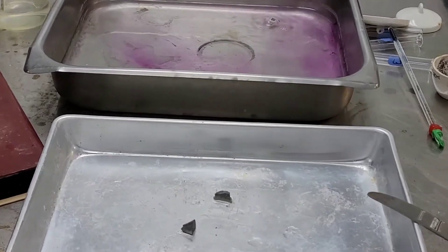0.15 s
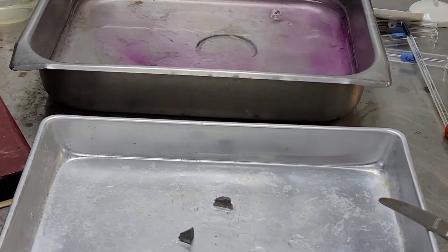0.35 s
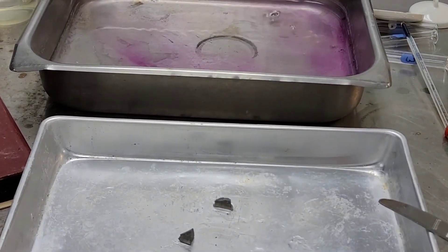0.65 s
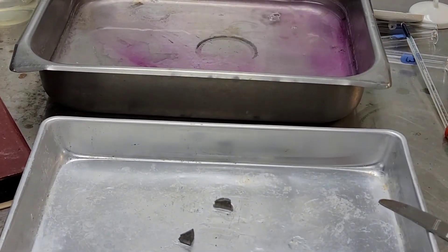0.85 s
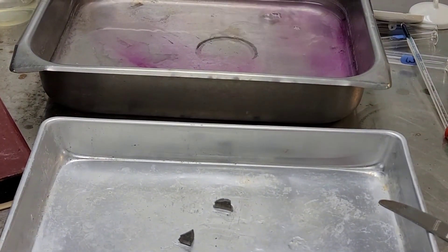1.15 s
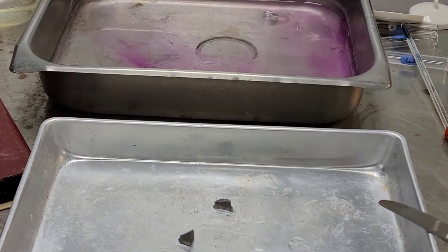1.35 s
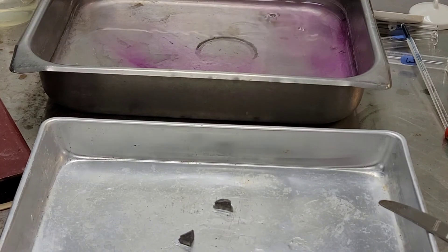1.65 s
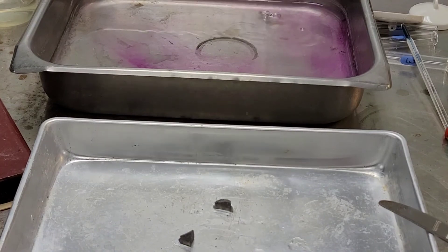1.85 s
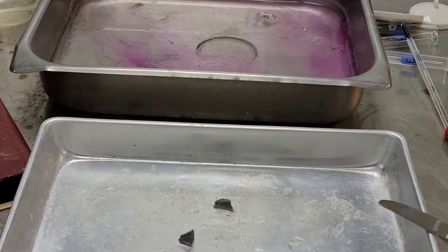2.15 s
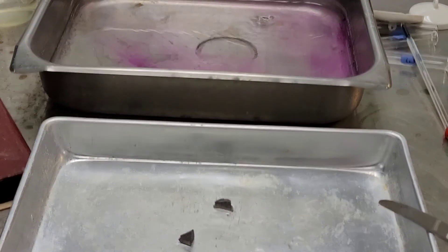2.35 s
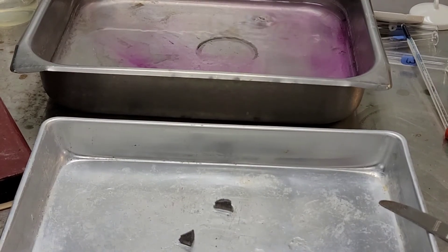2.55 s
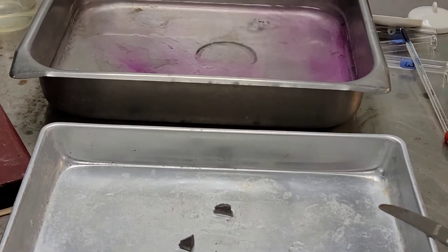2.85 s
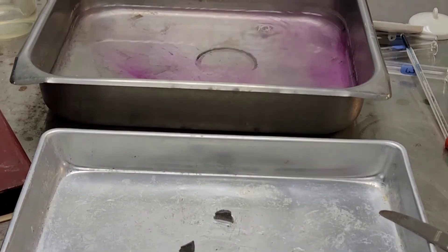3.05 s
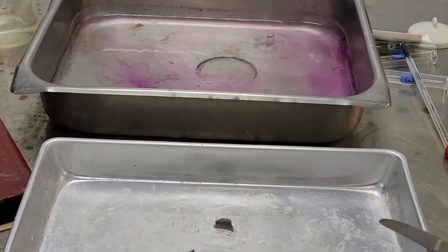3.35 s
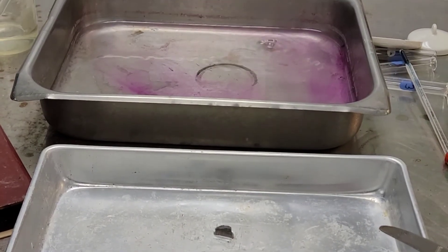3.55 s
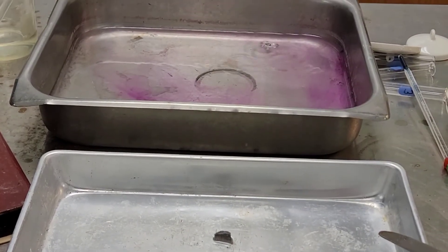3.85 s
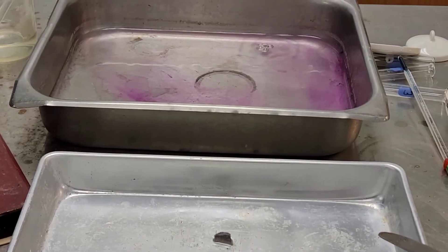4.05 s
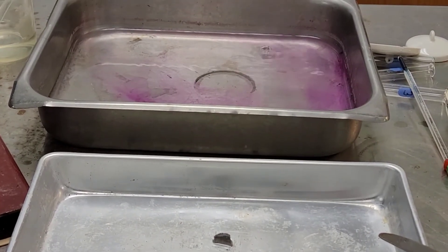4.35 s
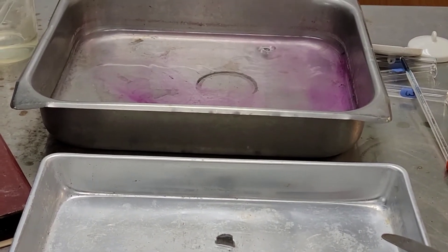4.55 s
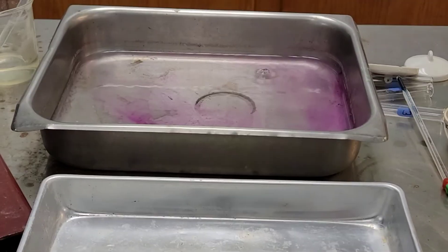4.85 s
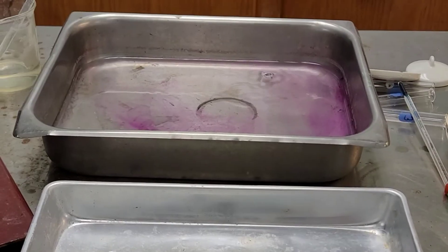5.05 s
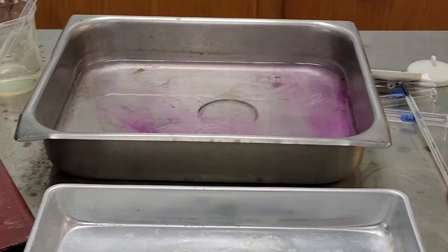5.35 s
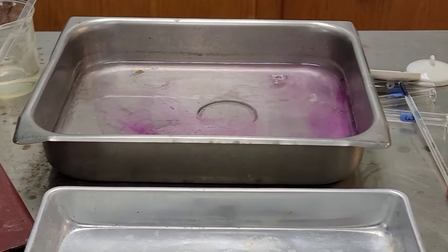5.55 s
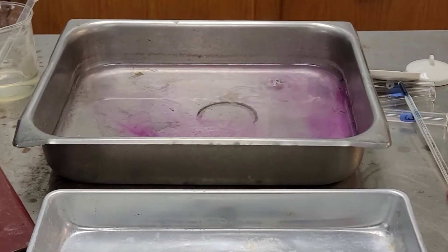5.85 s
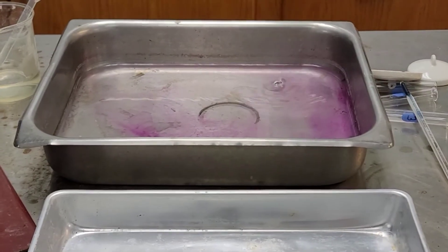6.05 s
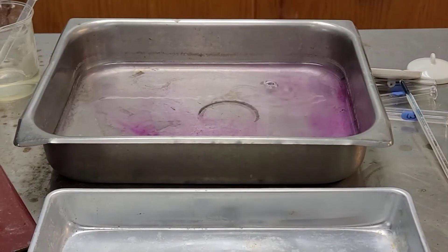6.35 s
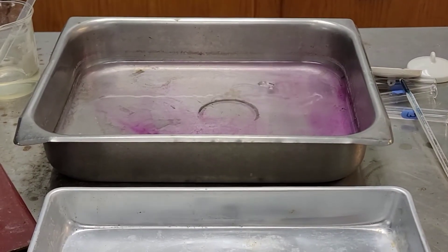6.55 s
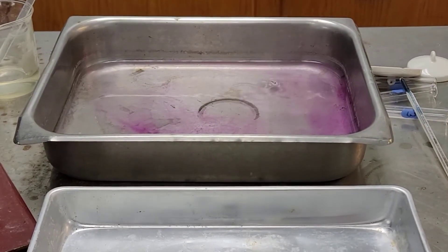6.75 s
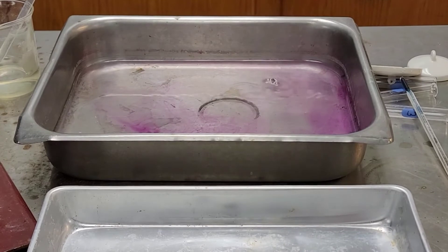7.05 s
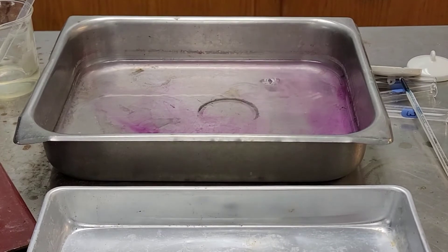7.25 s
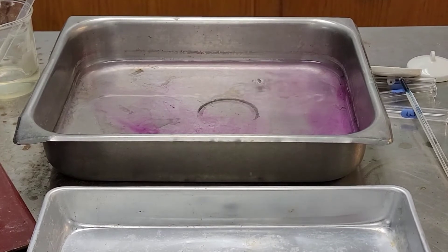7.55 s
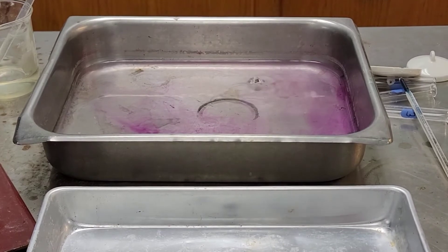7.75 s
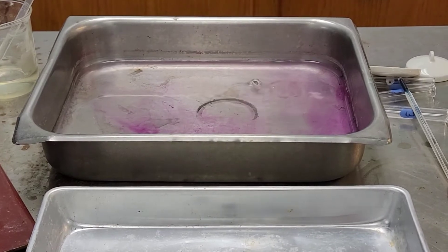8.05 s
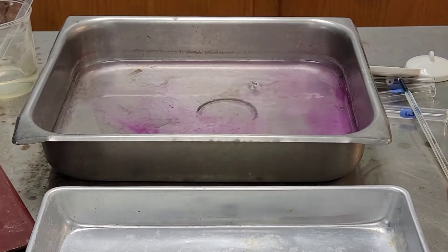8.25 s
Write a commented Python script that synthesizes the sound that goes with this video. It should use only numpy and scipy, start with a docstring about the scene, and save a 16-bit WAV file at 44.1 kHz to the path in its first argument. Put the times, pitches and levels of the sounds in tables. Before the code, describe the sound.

A bead of metal fizzes faintly on water in a steel pan, with small pops and occasional dull low thumps indoors.

```python
"""Indoors, hand-held stereo recorder close to a steel pan of water, low ventilation noise behind.
A bead of reactive metal skates on the water from the start, its gas escaping as a fine hiss of wandering
pitch; dull thumps roll through the floor now and then. Around 2 s a finger scuffs the recorder twice.
From 3 s small gas pops come more often. Past 6 s the hiss sinks in pitch, after 7 s the bead throws
three puffs of spray, and at 8 s the recorder's case takes a last knock."""
import sys
import numpy as np
from scipy import signal
from scipy.fft import rfft, irfft
from scipy.io import wavfile

SR = 44100
rng = np.random.default_rng(int(sys.argv[2]) if len(sys.argv) > 2 else 0)


def dump(signal):
    """Clip the signal to [-1, 1] and save it as 16-bit WAV at the path in sys.argv[1]."""
    limited = np.clip(np.atleast_2d(signal).T, -1, 1)
    pcm = np.round(limited * 32767).astype(np.int16)
    wavfile.write(sys.argv[1], SR, pcm)


N = 370881
TIME = np.arange(N) / SR
BINS = np.fft.rfftfreq(N, 1 / SR)

# ventilation at the two microphones: (frequency [Hz], in-phase density [dB], opposed density [dB])
ROOM_AIR = [(19.5, -97, -80), (50, -85.5, -82), (100, -74, -88), (158, -77, -92), (304, -77.5, -83),
            (491, -81.5, -79.5), (551, -90.5, -82.5), (703, -84, -84.5), (1050, -92.5, -88),
            (1390, -96, -93), (2600, -101, -99), (8500, -107, -106), (13100, -105, -103),
            (15900, -106, -104)]
# colour of the room's low rumble: (frequency [Hz], gain [dB])
RUMBLE_SPECTRUM = [(12, -27), (28, 0.5), (55, 1.5), (80, -0.5), (100, -11.5), (160, -14), (300, -28.5),
                   (800, -49)]
# modes of the floor: (frequency [Hz], width [Hz], gain [dB], duration against the thump's [ratio])
FLOOR_MODES = [(37.6, 12, -5.5, 1.6), (61.3, 17, -1.5, 1.05), (74.46, 8.4, -2.5, 1.085),
               (108.7, 27.9, -13.5, 1.15), (150, 31, -17.5, 0.54), (183, 50, -25, 0.93),
               (272, 34, -34.5, 0.63)]
# thumps through the floor: (start [s], level [dB], rise [s], decay [s], tilt [dB per octave])
FLOOR_THUMPS = [(.01, -18.5, 0.073, 0.087, .5), (.67, -39, 0.089, 0.079, 10),
                (.76, -38, 0.067, 0.058, -8.5), (.92, -32.5, 0.042, 0.16, -1),
                (1.45, -32.5, 0.18, 0.16, -2), (2.659, -26, 0.083, 0.088, 3.5),
                (3.15, -36, 0.038, 0.089, 2), (5.44, -17, 0.088, 0.081, -2), (6.52, -37, 0.054, 0.07, -8),
                (6.66, -20.5, 0.045, 0.093, 1), (7.38, -35, 0.048, 0.091, 1), (7.822, -17, 0.052, 0.079, 3)]
# finger on the recorder: (crest time [s], level [dB], rise [s], decay [s], extra for the body [dB])
FINGER_SCUFFS = [(1.836, -33.5, 0.0038, 0.0065, -16), (2.41, -29, 0.013, 0.019, 0),
                 (2.422, -23, 0.0024, 0.0092, -6.5), (2.445, -52, 0.0037, 0.012, 20.5),
                 (2.458, -39, 0.0034, 0.027, 5.5), (2.472, -33, 0.0075, .006, -19)]
# colour of rasping skin: (frequency [Hz], gain [dB])
SKIN_RASP = [(500, 1.5), (1000, -24), (1300, -14.5), (2400, -10.5), (4000, -18), (5500, -12), (6700, -2.5),
             (8100, -11.5), (11300, -3.5), (13700, -1.5), (15300, -2.5)]
# high ringing of the recorder's case: (frequency [Hz], width [Hz], gain [dB])
CASE_MODES = [(5825, 30, -2), (10300, 30, 2), (11180, 110, 3), (12890, 40, 8), (13090, 30, 7),
              (14480, 200, 2), (15195, 45, 13)]
# hollow body of the case: (frequency [Hz], width [Hz], gain [dB])
BODY_MODES = [(410, 190, 3.5), (689, 64, 10)]
# small knocks on the case: (time [s], level [dB], pitch [Hz], width [Hz])
CASE_KNOCKS = [(1.825, -30.5, 526, 109), (1.829, -28, 108, 70), (1.827, -35, 2190, 1500),
               (2.3872, -27, 2280, 400), (2.3884, -23, 6600, 620), (2.4, -21, 480, 183),
               (2.402, -26, 3020, 600), (2.435, -23, 2650, 1030), (8.0577, -28, 596, 497),
               (8.059, -53, 2220, 1600), (8.068, -33.5, 1080, 700), (8.084, -43, 1690, 910)]
# resonances of the steel pan: (frequency [Hz], width [Hz], gain [dB])
PAN_MODES = [(1850, 55, 8.5), (3123, 130, 6), (3860, 120, -2), (4604, 96, 4), (5250, 110, 5)]
# puffs of spray: (crest time [s], level [dB], half-length [s], centre [Hz])
SPRAY_PUFFS = [(7.248, -62.5, .016, 7460), (7.433, -56, .035, 3140), (7.522, -58, 0.029, 3000)]
# gas pops: (time [s], level [dB], pitch [Hz], width [Hz], left over right [dB])
GAS_POPS = [(0.653, -37, 6900, 900, -11), (2.93, -37.5, 8600, 2500, 15), (2.968, -38, 2030, 2000, 6),
            (3.297, -37.5, 8000, 5000, 18), (3.334, -50, 1210, 300, 16), (3.446, -35, 2330, 2470, 9),
            (3.7719, -25, 2300, 5100, 15.5), (3.889, -30.5, 4380, 5030, 21.5), (4.005, -38, 4600, 5000, 21),
            (4.0309, -30, 4450, 6000, 19.5), (4.813, -35.5, 5600, 3000, 5), (5.574, -43, 3140, 200, 18),
            (5.829, -34.5, 2360, 2500, 17), (5.864, -36, 3000, 3000, 25), (6.092, -40, 1680, 1500, 16),
            (6.450, -37, 8740, 900, 2), (6.903, -37, 7050, 1200, -6), (7.711, -34.5, 6440, 500, -6),
            (8.226, -34, 4230, 1800, 0), (8.305, -40, 2850, 240, -4)]
# hollow ring of the water under a 3500 Hz pop: (frequency [Hz], width [Hz], gain [dB])
PLOP_MODES = [(556, 800, -1), (885, 360, -12.5), (1760, 470, -6.5)]
# colour of the fine spray: (frequency [Hz], gain [dB])
SPRAY_SPECTRUM = [(1200, -8), (2500, 2), (5500, 4.5), (6900, 8), (8200, -8.5), (11000, -1), (16000, -4)]
# thin high sizzle, strongest while the bead is fresh: (time [s], level [dB])
SIZZLE_LEVEL = [(0, -64), (.85, -59), (1.3, -68.5), (2.2, -62.5), (2.7, -77), (4.2, -73), (5.2, -72),
                (8.4, -92)]
# gas pocket under the skating bead: (time [s], pitch [Hz], level [dB])
POCKET_PATH = [(0, 4050, -55), (.55, 4080, -55), (1.4, 4040, -54), (1.85, 3940, -54.5), (2.05, 4330, -49.5),
               (2.4, 4220, -51.5), (2.9, 4180, -56), (3.75, 4440, -53.5), (4.3, 4660, -55),
               (4.95, 4480, -54.5), (5.75, 4580, -52), (6.2, 4334, -55), (6.6, 3700, -52), (6.9, 3600, -55),
               (7.3, 3960, -52.5), (7.53, 3430, -53.5), (7.8, 3650, -55), (8.4, 3450, -58)]
# where the bead sits between the microphones: (time [s], left over right [dB])
BEAD_BEARING = [(0, -0.5), (2.3, 1), (3.5, 1.5), (6.0, 2), (6.8, -0.5), (8.4, -1.5)]


def amp(db):
    """Decibels to gain."""
    return 10 ** (np.asarray(db) / 20)


def unit(x):
    """Scale to rms 1."""
    return x / np.sqrt(np.mean(x ** 2) + 1e-20)


def in_time(rows):
    """Each column of a curve at every sample."""
    s, *columns = np.transpose(rows)
    return [np.interp(TIME, s, c) for c in columns]


def tint(x, spectrum):
    """Colour a signal by (frequency [Hz], gain [dB]) points."""
    hz, db = np.transpose(spectrum)
    return irfft(rfft(x) * amp(np.interp(np.log(BINS + 1), np.log(hz), db)), N)


def drift(per_s):
    """A random wander with rms 1."""
    knots = rng.standard_normal(4000)
    return unit(np.interp(TIME * per_s, np.arange(len(knots)), knots))


def resonate(x, hz, width_hz):
    """One resonance, gain 1 on top."""
    r = np.exp(-np.pi * width_hz / SR)
    feedback = [1, -2 * r * np.cos(2 * np.pi * hz / SR), r * r]
    return signal.lfilter(np.array([1, 0, -1]) * (1 - r * r) / 2, feedback, x + 1e-18)


def ringing(x, modes):
    """Resonances in parallel."""
    return sum(amp(db) * resonate(x, hz, width) for hz, width, db in modes)


def pair(mid, side, side_db):
    """Left and right from an in-phase and an opposed part, rms 1."""
    return unit(mid + amp(side_db) * side * np.array([[1], [-1]]))


def balance(db):
    """Microphone gains for a level difference, left over right."""
    return amp(np.array([[1], [-1]]) * db / 2)


def add(out, s, sound):
    """Mix a short sound in at a time."""
    i = round(s * SR)
    out[:, i:i + sound.shape[-1]] += sound[..., :N - i]


def swell(crest, rise, decay):
    """A rounded rise to 1, then an exponential fall."""
    t = TIME - crest
    return np.exp(-np.minimum(np.where(t < 0, (t / rise) ** 2, t / decay), 40))


def echoes(x, t60, samples=22050):
    """Diffuse reflections, different at each microphone, with the energy of the input."""
    t = np.arange(samples) / SR
    tail = rng.standard_normal((2, samples)) * amp(-60 * t / t60) * (t > .001)
    tail /= np.sqrt((tail ** 2).sum(1, keepdims=True))
    return signal.fftconvolve(np.atleast_2d(x), tail, axes=1)[:, :N]


def grains(per_s, spread_db):
    """Tiny impulses of uneven size at random moments."""
    sizes = amp(spread_db * np.minimum(rng.exponential(1, N), 6))
    return unit((rng.random(N) < per_s / SR) * sizes * rng.choice([-1, 1], N))


def burst(hz, width_hz, samples=4096):
    """One damped ring with a peak of 1; the push behind it is soft above twice its pitch."""
    push = signal.lfilter([1], [1, -np.exp(-4 * np.pi * hz / SR)], signal.unit_impulse(samples))
    ring = resonate(push, hz, width_hz)
    return ring / np.abs(ring).max()


def room(rumble_db=-47.5, heave_db=-27):
    """All around: steady ventilation over a low rumble that heaves again after each thump."""
    white, air = rng.standard_normal((4, N)), np.array(ROOM_AIR)
    mid, side = (np.sqrt(SR / 2) * tint(white[k], air[:, [0, k + 1]]) for k in range(2))
    rumble = pair(*tint(white[2:], RUMBLE_SPECTRUM), side_db=-13.5)
    heave = sum(amp(db + heave_db) * swell(s + 0.42, rise=0.15, decay=0.29)
                for s, db, *_ in FLOOR_THUMPS)
    return np.array([mid + side, mid - side]) + (amp(rumble_db) + heave) * rumble


def thumps():
    """Underfoot: each thump sets the floor's modes swelling; low ones tend to crest later and linger."""
    out = np.zeros(N)
    for hz, width, mode_db, stretch in FLOOR_MODES:
        band = resonate(resonate(rng.standard_normal(N), hz, width), hz, width)
        analytic = signal.hilbert(unit(band))
        motion = unit(analytic.real / (np.abs(analytic) + 0.037))  # nearly even in level
        octaves = np.log2(hz / 65)
        force = sum(amp(db + tilt * octaves)
                    * swell(s + rise * stretch, 0.61 * rise * stretch, decay * stretch)
                    for s, db, rise, decay, tilt in FLOOR_THUMPS)
        out += amp(mode_db) * force * motion
    # the two microphones differ slightly in phase
    return out + amp(-15.5) * np.imag(signal.hilbert(out)) * np.array([[1], [-1]])


def scuffs():
    """By the right microphone: a finger rasps in tiny slips; the case sounds hollow and rings high."""
    pressure = sum(amp(db) * swell(s, rise, decay) for s, db, rise, decay, _ in FINGER_SCUFFS)
    push = sum(amp(db + extra) * swell(s, rise, decay) for s, db, rise, decay, extra in FINGER_SCUFFS)
    slips = np.array([grains(per_s=8000, spread_db=1) for _ in range(2)])
    rasp = pressure * pair(*tint(slips, SKIN_RASP), side_db=1.0)
    body = push * pair(*ringing(ringing(slips, BODY_MODES), BODY_MODES), side_db=4.5)
    return (amp(1.5) * (rasp + ringing(rasp, CASE_MODES)) + amp(-3) * body) * balance(db=-5.5)


def knocks():
    """On the recorder: a finger knocks the case, which rings briefly."""
    out = np.zeros((2, N))
    for s, db, hz, width in CASE_KNOCKS:
        add(out, s, amp(db) * burst(hz, width))
    return (out + amp(-2.5) * echoes(out, t60=0.15)) * balance(db=1.5)


def pinpricks(level_db=-50, spread_db=9, count=90):
    """Across the water: tiny bubbles burst at random, each at its own high pitch."""
    out = np.zeros((2, N))
    for when, pitch, size, side in rng.random((count, 4)):
        ping = amp(level_db + spread_db * size ** 3) * burst(hz=5500 + 8000 * pitch, width_hz=800)
        add(out, when * TIME[-1], ping * balance(db=8 * (side - .5)))
    return out + echoes(out, t60=.015)


def puffs():
    """Centre: the bead throws out brief, broad clouds of spray."""
    out = np.zeros(N)
    for s, db, half_length, hz in SPRAY_PUFFS:
        cloud = unit(resonate(grains(per_s=5800, spread_db=-1.5), hz, width_hz=.5 * hz))
        out += amp(db) * np.exp(-((TIME - s) / half_length) ** 2 / 2) * cloud
    return amp(4.5) * (out + echoes(out, t60=0.02))


def pops(plop_db=-12, plop_db_per_octave=-7):
    """Mostly left: larger bubbles snap over a hollow plop; the pan rings and the room answers duller."""
    out = np.zeros((2, N))
    for s, db, hz, width, side in GAS_POPS:
        smallness = hz / 3500  # smaller bubbles have a higher, weaker plop
        plop = sum(amp(mode_db) * burst(mode_hz * smallness ** .2, mode_width)
                   for mode_hz, mode_width, mode_db in PLOP_MODES)
        plop *= amp(plop_db + plop_db_per_octave * np.log2(smallness))
        add(out, s, amp(db) * balance(side) * (burst(hz, width) + plop))
    out += amp(-10.5) * ringing(out, PAN_MODES)
    dull = signal.sosfilt(signal.butter(1, 4000, fs=SR, output="sos"), out)
    early = amp(-10.5) * echoes(out, t60=0.026) + amp(-1.5) * echoes(dull, t60=0.08)
    return out + early + amp(-17) * echoes(dull, t60=0.75)


def spray(flicker_db=3.5, bands=9):
    """Around the bead: droplets of many sizes; each band of pitch flickers on its own."""
    edges_hz, out = np.geomspace(1200, 16000, bands + 1), np.zeros(N)
    for band in zip(edges_hz, edges_hz[1:]):
        bandpass = signal.butter(2, band, "band", fs=SR, output="sos")
        drops = signal.sosfilt(bandpass, grains(per_s=2300, spread_db=4.5))
        out += drops * amp(flicker_db * drift(per_s=28))
    out = tint(out, SPRAY_SPECTRUM)
    return unit(out + amp(1.5) * echoes(out, t60=0.064))


def in_pan(x, echo_db):
    """The steel walls colour the sound and throw it back and forth."""
    coloured = x + ringing(x, PAN_MODES)
    return unit(coloured + amp(echo_db) * echoes(coloured, t60=0.04))


def gas_pocket(x, hz, width_hz, block=128):
    """The pocket under the bead: a resonance whose pitch moves, applied twice for steep skirts."""
    r, out, state = np.exp(-np.pi * width_hz / SR), np.zeros(N), np.zeros((2, 2))
    for i in range(0, N, block):
        section = [1 - r, 0, r - 1, 1, -2 * r * np.cos(2 * np.pi * hz[i] / SR), r * r]
        out[i:i + block], state = signal.sosfilt([section, section], x[i:i + block], zi=state)
    return unit(out)


def fizz(wander=0.034, surge_db=1.07, sputter_db=2.0, fresh_db=2.5, fresh_s=0.83):
    """Close, near centre: gas bursts ring the pocket; hiss, sizzle and spray all sputter together."""
    pocket_hz, hiss_db = in_time(POCKET_PATH)
    sizzle_db, = in_time(SIZZLE_LEVEL)
    bearing_db, = in_time(BEAD_BEARING)
    surge = drift(per_s=6)  # the gas comes in surges, which also lift the pitch a little
    sputter = amp(surge_db * surge + sputter_db * drift(per_s=24))
    hiss_hz = pocket_hz * (1 + 0.0085 * surge + wander * drift(per_s=35))
    low_ring = gas_pocket(grains(per_s=9000, spread_db=3.0), hiss_hz, width_hz=1070)
    hiss = amp(hiss_db - 2.75) * in_pan(low_ring, echo_db=-2)
    sizzle_hz = pocket_hz * (2.09 + .055 * TIME)  # the ratio climbs as the bead shrinks
    high_ring = gas_pocket(grains(per_s=2000, spread_db=4.0), sizzle_hz, width_hz=2600)
    sizzle = amp(sizzle_db) * in_pan(high_ring, echo_db=5)
    spray_db = -60.5 + fresh_db * np.exp(-(TIME / fresh_s) ** 4)  # more while the bead is fresh
    return (hiss + sizzle + amp(spray_db) * spray()) * sputter * balance(bearing_db)


def scene():
    """What reaches the microphones: room, floor, hand and pan."""
    return room() + thumps() + scuffs() + knocks() + pinpricks() + puffs() + pops() + fizz()


def record(dry):
    """The recorder cuts the top steeply above 15.7 kHz."""
    return signal.sosfilt(signal.ellip(12, .1, 80, 15700, fs=SR, output="sos"), dry)


dry = scene()
out = record(dry)
dump(out)
```